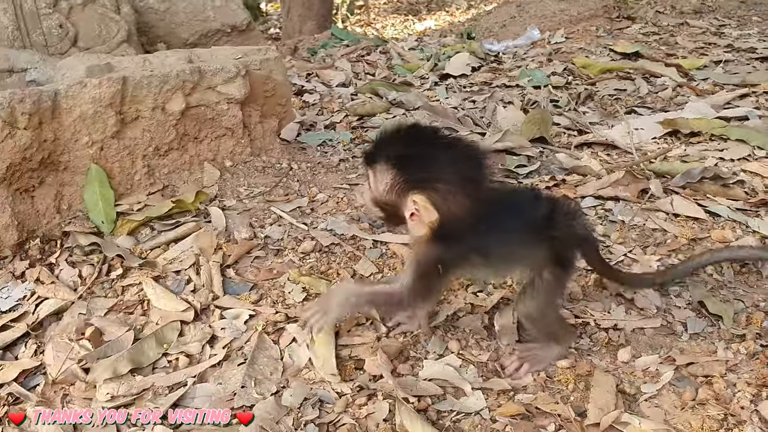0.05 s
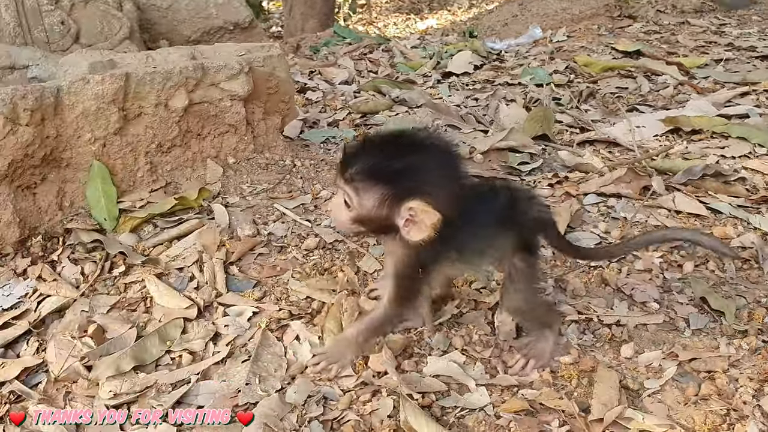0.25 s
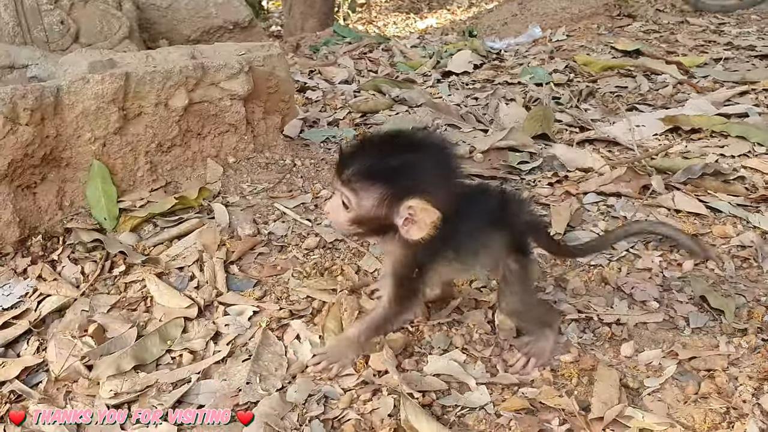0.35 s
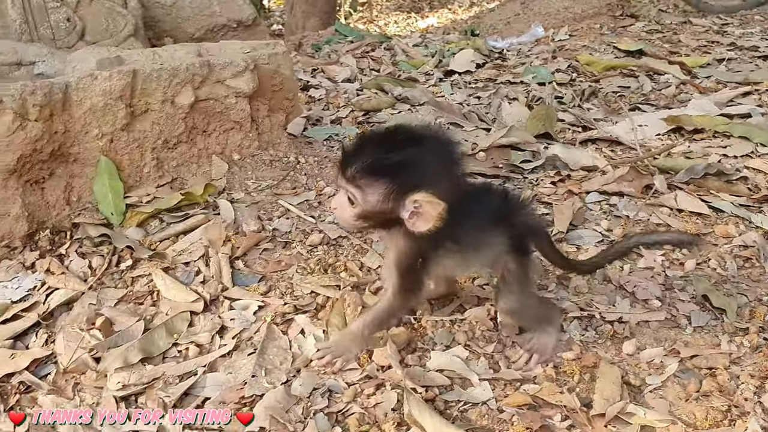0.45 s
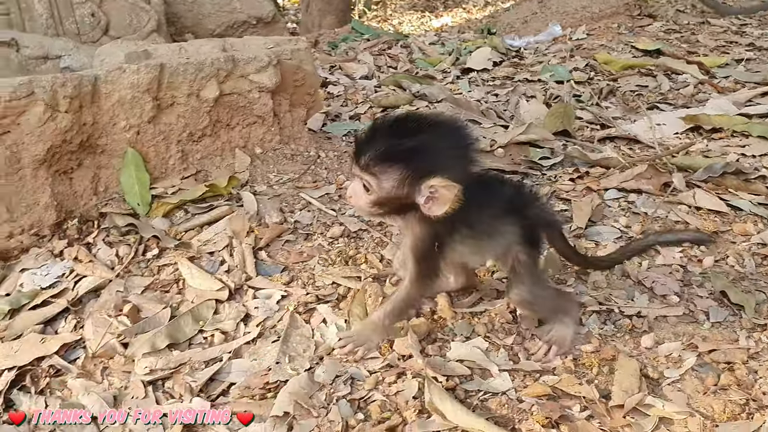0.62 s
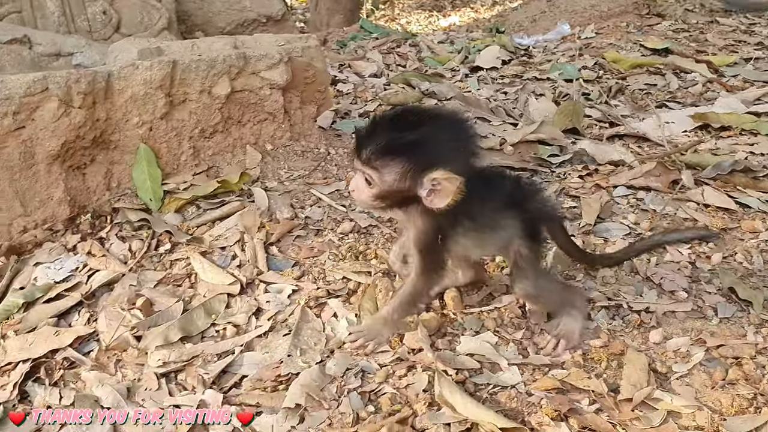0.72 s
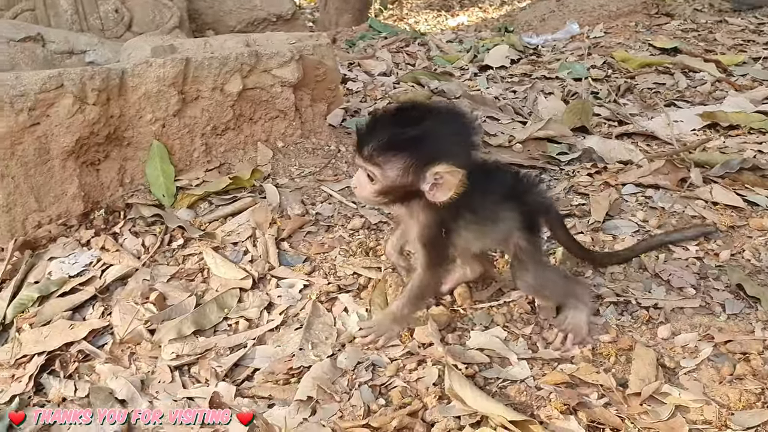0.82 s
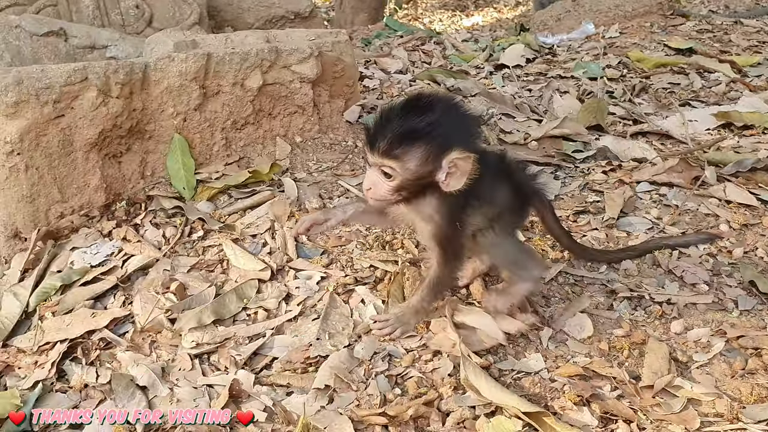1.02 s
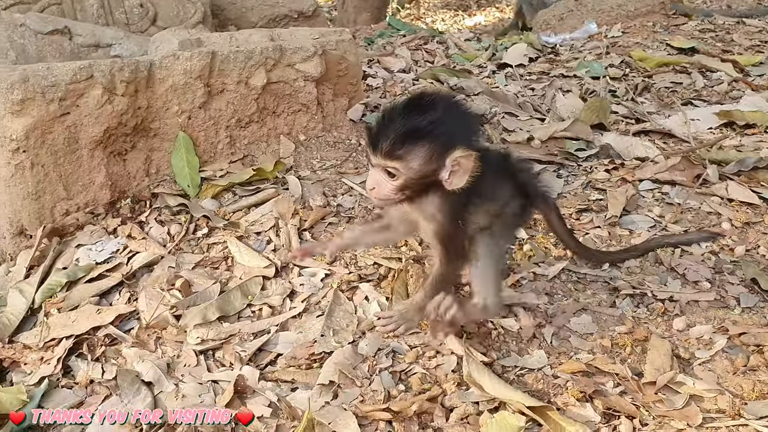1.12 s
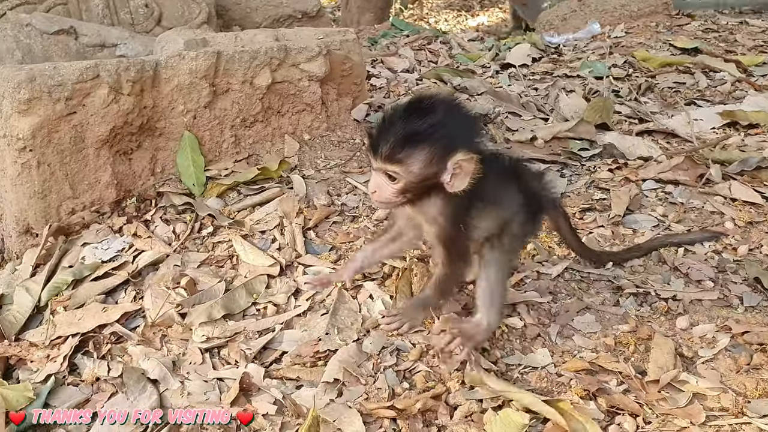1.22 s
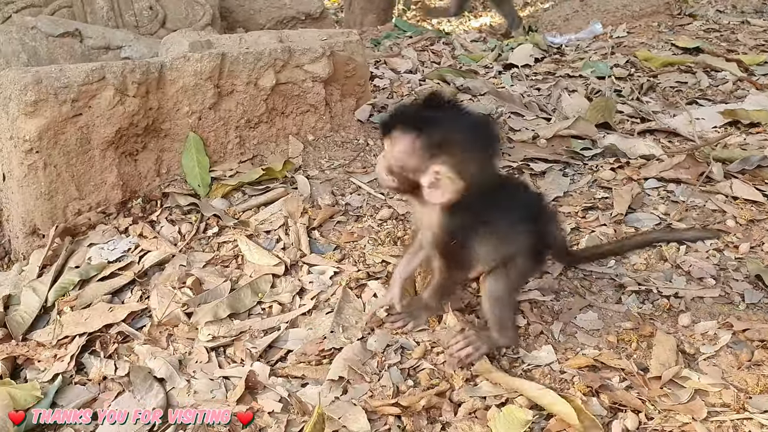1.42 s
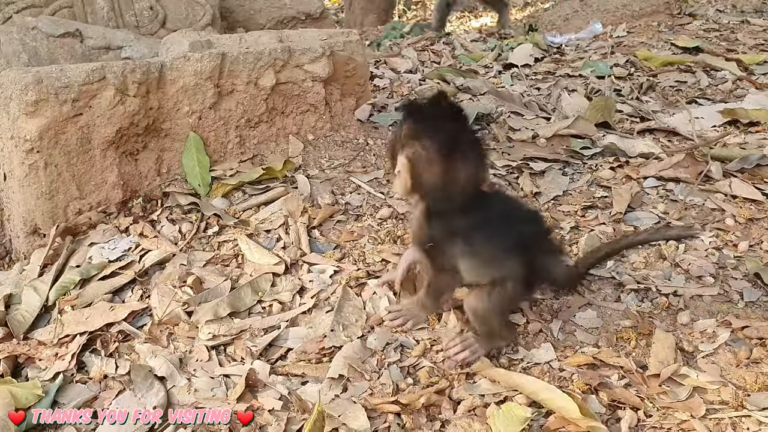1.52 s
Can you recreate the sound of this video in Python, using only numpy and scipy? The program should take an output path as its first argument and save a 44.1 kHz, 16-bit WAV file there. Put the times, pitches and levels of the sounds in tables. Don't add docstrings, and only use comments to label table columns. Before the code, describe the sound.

Dry leaves crackle and crunch as a small monkey scrambles over them outdoors, slightly left of a handheld stereo microphone; sharp stem snaps cluster early, then soften to sparse rustles over low wind buffeting and distant murmur.

```python
import sys
import numpy as np
from scipy import signal
from scipy.fft import rfft, irfft, next_fast_len
from scipy.io import wavfile
from scipy.ndimage import uniform_filter1d

SR = 44100
rng = np.random.default_rng(int(sys.argv[2]) if len(sys.argv) > 2 else 0)


def store_pcm(level_fs):
    pcm = np.round(np.clip(level_fs, -1, 1) * 32767).astype(np.int16)
    wavfile.write(sys.argv[1], SR, np.atleast_2d(pcm).T)


def boost(x):
    u = np.asarray(x, float) / 20
    return 10 ** u


N = 68355

SIZE = next_fast_len(N + 8192) // 2 * 2
HZ = np.maximum(np.arange(SIZE // 2 + 1) * SR / SIZE, 1)
T = np.arange(N) / SR
SETTLING_BODY_DB = -9


def rms_one(x):
    return x / np.sqrt(np.mean(x ** 2) + 1e-20)


def in_time(rows):
    s, *columns = np.transpose(rows)
    return [np.interp(T, s, column) for column in columns]


def gain_at(points):
    hz, db = np.transpose(points)
    return boost(np.interp(np.log(HZ), np.log(hz), db))


def response(points):
    cepstrum = irfft(np.log(rms_one(gain_at(points))), SIZE)
    cepstrum[1:SIZE // 2] *= 2
    cepstrum[SIZE // 2 + 1:] = 0
    return np.exp(rfft(cepstrum))


def delay(ms):
    return np.exp(-2j * np.pi * HZ * ms / 1000)


def colour(x, points, lag_ms=0):
    return irfft(rfft(x, SIZE) * response(points) * delay(lag_ms), SIZE)[..., :N]


def common(alike):
    return np.sqrt([[alike], [1 - alike], [1 - alike]]) * rng.standard_normal((3, N))


def drift(rate_hz):
    r = np.exp(-2 * np.pi * rate_hz / SR)
    wander = signal.lfilter([1], [1, -2 * r, r * r], rng.standard_normal(N + SR))
    return rms_one(wander[SR:])


def air():
    # f/Hz, density/dB per Hz
    left_hiss = [(100, -24), (300, -8), (700, -9.5), (1500, -13), (5500, -17), (8000, -44), (10000, -26),
                 (16000, -17)]
    # f/Hz, density/dB per Hz
    right_hiss = [(100, -4), (300, 2.5), (700, -9.5), (1500, -5), (5500, -7.5), (8000, -13), (10000, -4),
                  (16000, -31)]
    shared, left, right = common(0.18)
    return boost(-58) * np.array([colour(shared + left, left_hiss, 0.23), colour(shared + right, right_hiss)])


def far():
    # t/s, level/dB
    murmur_swells = [(0, -72), (.1, -65), (.25, -63), (.9, -62.5), (1.1, -69.5), (1.3, -60), (1.42, -65.5),
                     (1.5, -61), (1.55, -63.5)]
    # f/Hz, density/dB per Hz
    murmur_tone = [(120, -27.5), (250, 2.5), (450, -5), (650, -1.5), (800, -19.5), (1500, -19.5)]
    shared, left, right = common(0.87) * boost(in_time(murmur_swells)[0])
    ports = np.array([colour(shared + left, murmur_tone, 0.24), colour(shared + right, murmur_tone)])
    return ports * boost(5.5)


def breeze():
    # t/s, level/dB
    left_gusts = [(0, -94), (.15, -57), (.3, -58), (.455, -46), (.51, -58), (.55, -42), (.61, -34),
                  (.68, -99), (.75, -47), (.86, -91), (.99, -50), (1.08, -82), (1.14, -48), (1.23, -44.5),
                  (1.32, -50), (1.375, -40.5), (1.41, -77), (1.46, -41.5), (1.5, -86)]
    # t/s, level/dB
    right_gusts = [(0, -55.5), (.1, -45), (.2, -46), (.36, -64), (.455, -32.5), (.51, -43.5), (.57, -36.5),
                   (.67, -43), (.8, -43), (.855, -43.5), (.96, -46), (1.02, -44), (1.06, -46.5),
                   (1.12, -47), (1.35, -42.5), (1.41, -46.5), (1.45, -43.5), (1.55, -43.5)]
    # f/Hz, density/dB per Hz
    rumble_tone = [(20, -1.5), (55, 2.5), (110, 1), (200, -4.5), (400, -25.5), (900, -51), (3000, -102)]
    gust_db, gusts_per_s = 3, 25
    evenness, even_s = 0.5, 0.04
    lumps = boost(gust_db * np.array([drift(gusts_per_s), drift(gusts_per_s)]))
    shared, *own = common(0.21)
    noise = colour(lumps * (shared + np.array(own)), rumble_tone)
    noise = noise / uniform_filter1d(noise ** 2, int(even_s * SR)) ** (evenness / 2)
    return boost(in_time(left_gusts) + in_time(right_gusts)) * rms_one(noise) * boost(-4)


def eddies():
    # t/s, f/Hz, left level/dB, right level/dB, +1 together or -1 opposed
    single_eddies = [(0.3, 67, -40, -38, -1), (0.361, 79, -49, -38, 1), (0.377, 97, -40, -48, -1),
                     (0.384, 290, -49, -60, 1), (0.413, 108, -36, -34, -1), (0.446, 117, -31, -40, -1),
                     (0.449, 240, -39, -34, 1), (0.458, 61.4, -33.5, -34, -1), (0.555, 59, -37, -33, 1),
                     (0.606, 104, -31.5, -36, 1), (0.853, 50.5, -95, -34.5, -1),
                     (1.026, 94.5, -61, -39.5, 1), (1.108, 93, -59, -38.5, -1), (1.155, 101, -54, -36, 1),
                     (1.184, 92, -51, -40, 1), (1.253, 69.6, -50, -37.5, 1), (1.298, 105, -50, -38.5, -1),
                     (1.353, 72.5, -47, -41.5, -1), (1.374, 143, -40, -37.5, 1), (1.454, 91, -50, -36, 1),
                     (1.513, 68, -60, -36.5, 1),
                     (.11, 74.6, -68, -43.5, 1), (0.243, 90, -59, -46, 1), (.627, 54, -46, -37.5, 1),
                    (0.744, 65.5, -42, -43.5, 1), (0.779, 175, -42, -51.5, 1), (0.941, 65, -72, -49, 1),
                    (1.225, 60, -41, -51, 1)]
    spread_cycles = 0.7
    out = 0
    for s, hz, left_db, right_db, sign in single_eddies:
        turns = (T - s) * hz
        swing = np.exp(-(turns / spread_cycles) ** 2 / 2) * np.sin(2 * np.pi * (turns + rng.random()))
        out = out + np.array([[boost(left_db + 0.5)], [sign * boost(right_db + 1)]]) * swing
    return out


def curls():
    # t/s, half length/s, f/Hz, level/dB
    singing_leaves = [(0.226, 0.0035, 1960, -42), (0.311, 0.022, 2110, -43.5), (0.392, 0.013, 2260, -38),
                      (.532, 0.0087, 13200, -32), (0.716, 0.0058, 2250, -42.5), (0.75, 0.017, 4140, -44.5),
                      (0.782, .014, 4340, -49.5), (.808, 0.0054, 6660, -45.5), (0.936, 0.012, 4470, -49),
                      (1.081, 0.0065, 4400, -49.5), (1.135, .009, 2800, -56)]
    half_width, lead_ms = 0.08, 0.45
    out = 0
    for s, half_s, hz, db in singing_leaves:
        edges_hz = [hz * (1 - half_width), hz * (1 + half_width)]
        band = signal.butter(2, edges_hz, "band", fs=SR, output="sos")
        tone = rms_one(signal.sosfilt(band, rng.standard_normal(N)))
        out = out + boost(db) * np.exp(-((T - s) / half_s) ** 2) * tone
    return np.array([out, irfft(rfft(out, SIZE) * delay(lead_ms), SIZE)[:N]])


def cracks():
    # t/s, peak level/dB
    stems = [(.2168, -23), (.2281, -20), (.2562, -24), (.2865, -24), (.2935, -22), (.3150, -21),
             (.3357, -22), (.3805, -21), (.3930, -16), (.4033, -14), (.4239, -21), (.4495, -19),
             (.4657, -20), (.5357, -17), (.5577, -25), (.5967, -21), (.6010, -21), (.6513, -30),
             (.7078, -27), (.7145, -25), (.7185, -19), (.7391, -15), (.7492, -19), (.7638, -22),
             (.774, -23), (.790, -26), (.9497, -35), (.9615, -38), (.9794, -39), (1.0556, -35),
             (1.0744, -30), (1.1348, -35), (1.1514, -36), (1.1765, -40), (1.1913, -37), (1.2535, -42),
             (1.2697, -41), (1.3279, -40), (1.3371, -40), (1.4634, -41)]
    fade_s = 0.0003
    return sum(boost(db - 4) * np.exp(-np.maximum(T - s, 0) / fade_s) * (T >= s) for s, db in stems)


def snaps():
    snaps_per_s, spread_db, largest, ring_s, rub_db = 1800, 3.6, 2.0, 0.0004, 3
    sizes = boost(spread_db * np.minimum(rng.exponential(1, N), largest))
    born = sizes * (rng.random(N) < snaps_per_s / SR)
    r = np.exp(-1 / (ring_s * SR))
    rattle = rms_one(signal.lfilter([1], [1, -r], born))
    return rms_one(rattle + boost(rub_db))


def effort():
    # peak t/s, level/dB, rise/s, fall/s, body against crisp top/dB
    treads = [(0.226, -31.5, 0.02, 0.014, -12.5), (0.256, -33.5, 0.0036, 0.0069, -23),
              (0.292, -31.5, 0.046, 0.045, -11.5), (0.319, -30.5, 0.077, 0.04, -8),
              (0.373, -34.5, 0.023, 0.092, -5.5), (0.399, -23.5, 0.034, 0.051, -7.5),
              (0.445, -21.5, 0.014, 0.039, -9.5), (0.468, -31.5, 0.025, 0.043, -8.5),
              (0.536, -27, 0.037, 0.025, -13.5), (0.601, -33, 0.094, 0.055, -10.5),
              (0.72, -25, 0.0097, 0.069, -17), (0.74, -27, 0.03, 0.077, -12.5),
              (0.774, -35.5, 0.078, 0.074, -5), (0.809, -34.5, .02, 0.0079, -15),
              (.870, -48, 0.047, 0.078, -8.5), (0.934, -44, 0.17, 0.061, -8),
              (0.95, -47, .012, 0.0069, -20), (1.075, -39, 0.012, 0.031, -20),
              (1.088, -44.5, 0.022, .012, -11), (1.138, -39.5, 0.016, 0.037, -12),
              (1.146, -43.5, 0.019, 0.024, -28), (1.205, -44.5, 0.063, 0.038, -9.5),
              (1.33, -53.5, 0.26, 0.11, -8), (1.449, -49.5, 0.041, 0.038, -7)]
    # t/s, level/dB
    settling = [(0, -68), (.19, -67), (.25, -57), (.35, -36.5), (.52, -36), (.69, -42.5), (.85, -50.5),
                (1.02, -55.5), (1.55, -57)]
    crisp = boost(in_time(settling)[0]) ** 2
    body = crisp * boost(SETTLING_BODY_DB) ** 2
    for s, db, rise_s, fall_s, body_db in treads:
        tread = boost(db - 20 * np.maximum((s - T) / rise_s, (T - s) / fall_s)) ** 2
        crisp = crisp + tread
        body = body + tread * boost(body_db) ** 2
    return np.sqrt(crisp), np.sqrt(body)


def leaves():
    # from t/s, left lead/ms, ground echo/ms, ringing leaf f/Hz, its lift/dB
    spots = [(0, 0.43, 0.24, 2060, 9), (.265, 0.53, 0.77, 3430, 1.5), (0.347, 0.5, 0.3, 2220, 0),
             (0.431, 0.52, 0.29, 1757, 2), (0.507, 0.46, 0.32, 3400, 6.5), (0.572, 0.46, 0.36, 3900, 3.5),
             (0.703, 0.44, 0.45, 640, 8), (.83, 0.47, 0.61, 4900, 2), (1.04, 0.428, 0.277, 4170, 1.5),
             (1.11, 0.46, 0.28, 2720, 8), (1.159, 0.42, 0.23, 4170, 2.5), (1.27, 0.46, 0.61, 7200, 0.5),
             (1.40, 0.42, 0.32, 2560, 1.5)]
    # t/s, level of the unshared part/dB
    strewn_widths = [(.2, 1), (.3, -4), (.35, 2), (.45, -2), (.5, 1), (.6, -1), (.7, 2), (.735, -7),
                     (.79, -7), (.83, 2), (.895, -5), (.96, 2), (1.08, 0), (1.12, -4), (1.17, -4),
                     (1.23, 2)]
    # f/Hz, density/dB per Hz
    body_tone = [(150, -7), (350, -8.5), (1000, -5.5), (2100, 0.5), (2900, -2.5), (3900, -2.5),
                 (6000, -19.5), (10000, -22)]
    # f/Hz, density/dB per Hz
    crisp_tone = [(2000, -25), (5000, -8), (8000, -8.5), (9700, -4), (10500, 0), (12000, 1.5), (14000, 0.5),
                  (16000, -7.5)]
    # f/Hz, level/dB
    unshared_tone = [(500, 0), (1300, -4), (2200, -1), (3200, -5), (4400, 0), (5600, -2), (8000, 0),
                     (16000, 0)]
    echo_db, scatter_db, scatter_ms = -19.5, -21, 2.5
    leaf_width_oct, right_louder_db = 0.24, 1.9

    crisp, body = effort()
    lone = cracks()
    strewn = boost(in_time(strewn_widths)[0] * [[0], [1], [1]])
    top = strewn * common(0.72) * (crisp * snaps() + lone)
    low = strewn * common(0.84) * (body * snaps() + lone * boost(SETTLING_BODY_DB))

    bend = 1 - 0.33 * np.exp(-(HZ / 1729.6) ** 2)
    apart = gain_at(unshared_tone)
    crisp_filter, body_filter = response(crisp_tone), response(body_tone)
    ends = [row[0] for row in spots[1:]] + [N]
    out = 0
    for (start, lead_ms, echo_ms, hz, lift_db), end in zip(spots, ends):
        here = (T >= start) & (T < end)
        paths = 1 + boost(echo_db) * delay(echo_ms)
        for sign, late in zip((1, -1, 1, -1), rng.uniform(0.202, 1, 4)):
            paths = paths + boost(scatter_db) * sign * delay(scatter_ms * late)
        ring = boost(lift_db * np.exp(-(np.log2(HZ / hz) / leaf_width_oct) ** 2))
        crunch = rfft(top * here, SIZE) * crisp_filter + rfft(low * here, SIZE) * body_filter
        shared, left, right = crunch * paths * ring
        out = out + np.array([shared + left * apart, (shared + right * apart) * delay(lead_ms * bend)])
    balance = boost([[-right_louder_db / 2], [right_louder_db / 2]])
    return irfft(out, SIZE)[:, :N] * boost(0.5) * balance


def scene():
    return air() + far() + breeze() + eddies() + curls() + leaves()


def low_pass(x):
    return signal.sosfilt(signal.butter(12, 16470, fs=SR, output="sos"), x)


def record(dry):
    steep = signal.ellip(12, 0.3, 70, 15720, fs=SR, output="sos")
    return low_pass(signal.sosfilt(steep, dry))


dry = scene()
out = record(dry)
store_pcm(out)
```